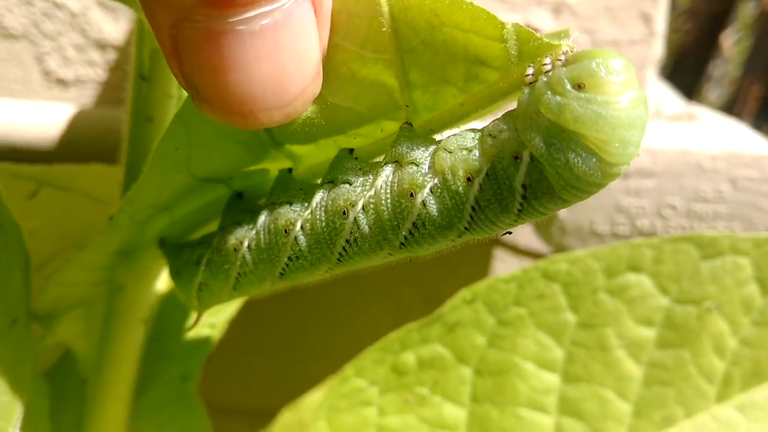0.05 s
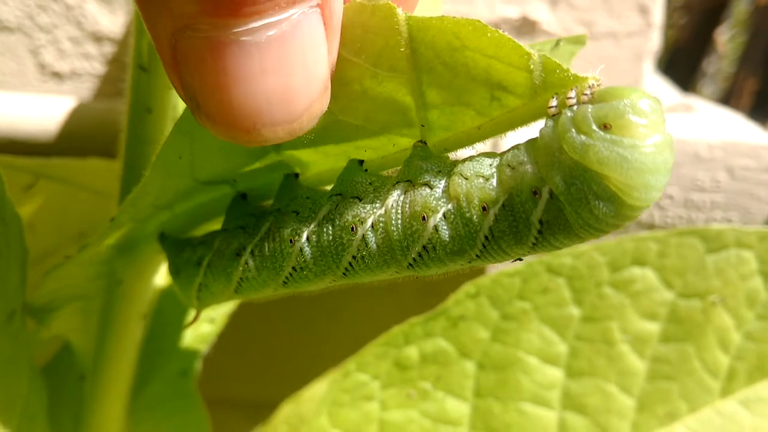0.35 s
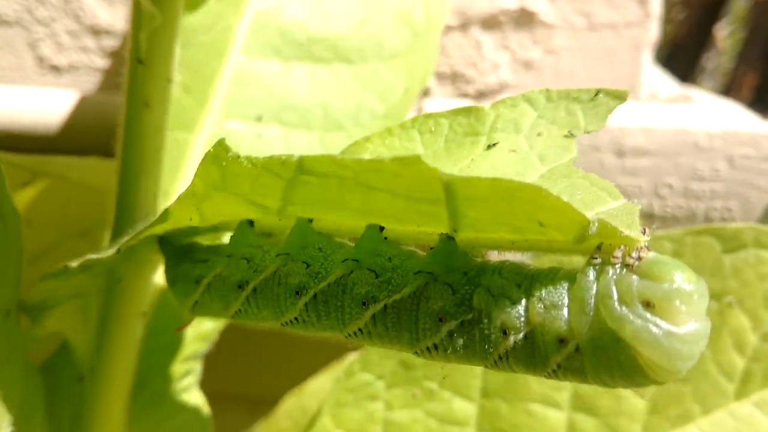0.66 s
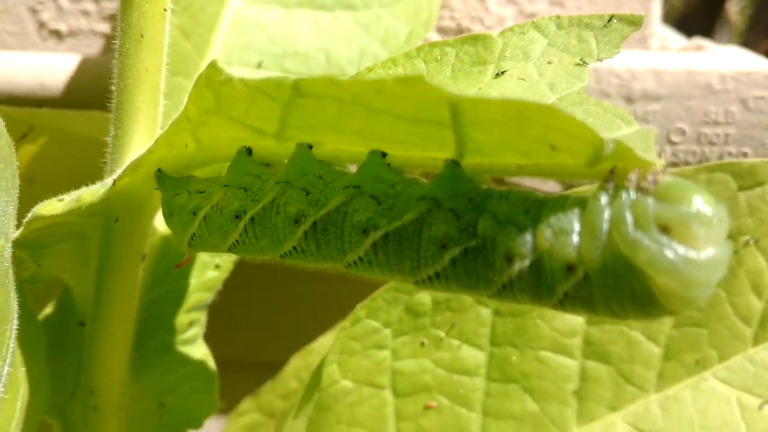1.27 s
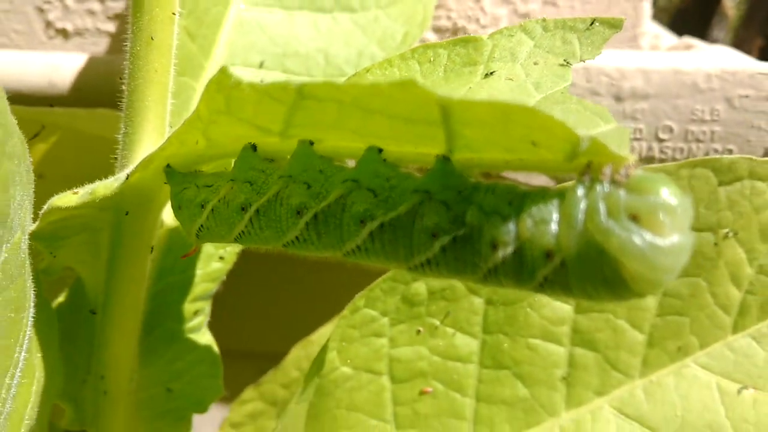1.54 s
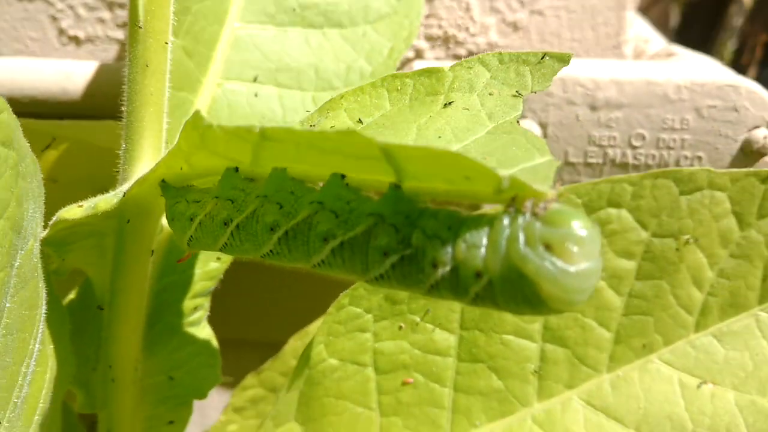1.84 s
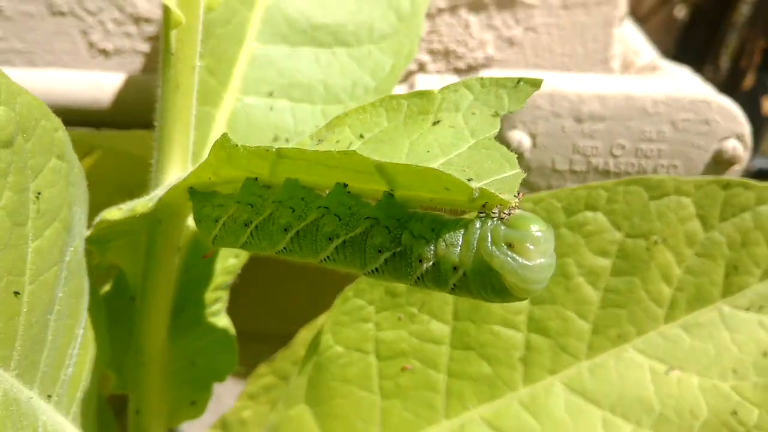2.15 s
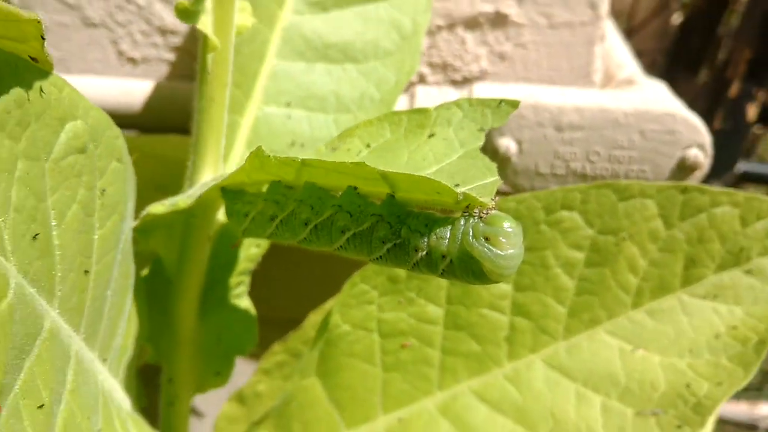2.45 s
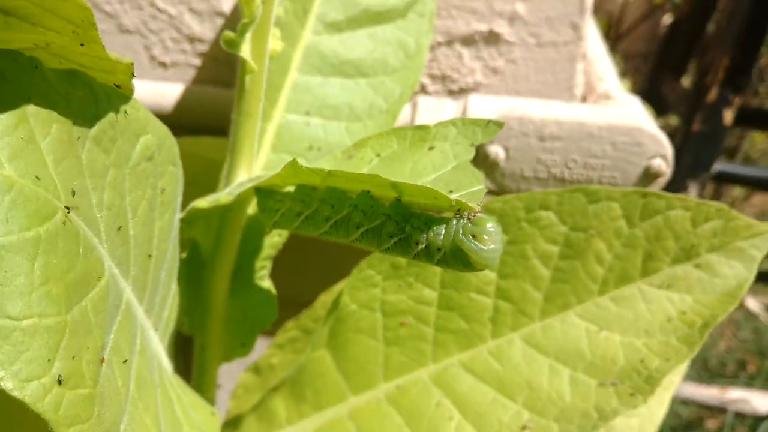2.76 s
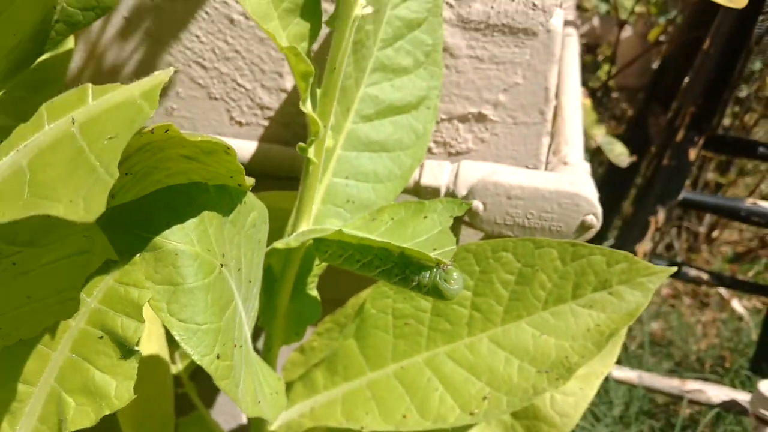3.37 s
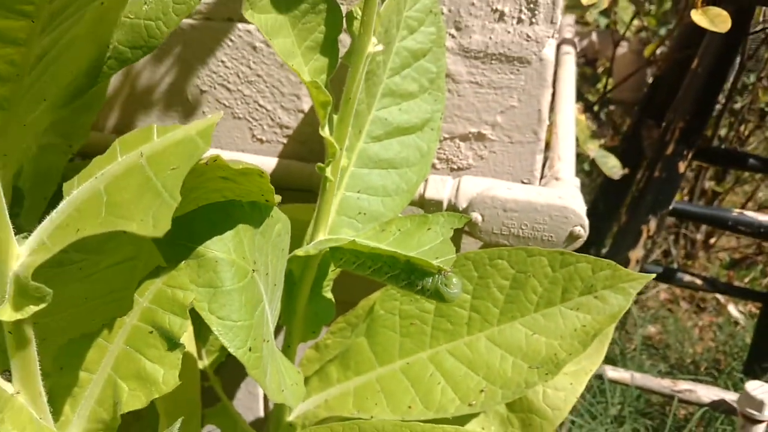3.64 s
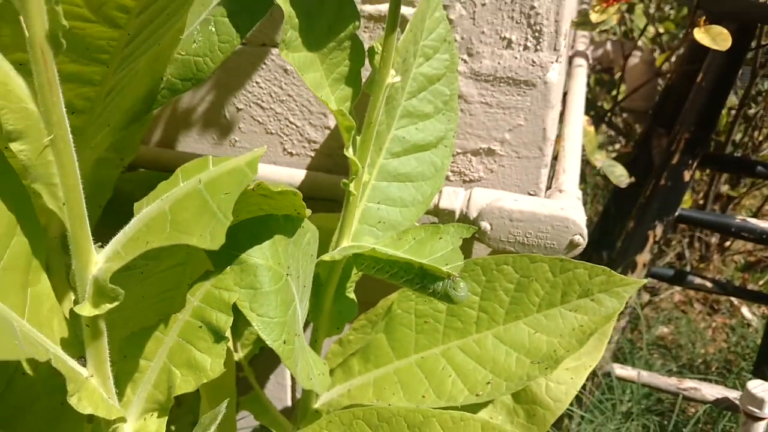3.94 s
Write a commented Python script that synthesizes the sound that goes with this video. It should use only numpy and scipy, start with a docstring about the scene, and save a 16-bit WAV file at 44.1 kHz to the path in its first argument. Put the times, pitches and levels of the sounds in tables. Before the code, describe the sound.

Low outdoor hum, like an air conditioner and far traffic, sits slightly to the right with faint birds. A leaf is released with a soft rustle near the microphone, followed by a few sharp handling clicks and one louder knock.

```python
"""Quiet garden, handheld camera

Far off to the right: a wash like traffic, faint birds, and a humming motor and fan, probably an
air conditioner. A narrow hiss flutters under a thin, electronic-sounding whine. Close to the
microphones a leaf is let go with a faint rustle, and fingers tick and knock on the camera as it draws
back. The recorder widens its pair by cross-feeding them; the loudest knock makes its gain control duck."""
import sys
import numpy as np
from scipy import signal
from scipy.fft import rfft, irfft
from scipy.io import wavfile

SR = 44100
rng = np.random.default_rng(int(sys.argv[2]) if len(sys.argv) > 2 else 0)


def unload_audio(sound):
    """Save the sound as a 16-bit wav file, at the path given as the first command line argument."""
    columns = np.transpose(np.atleast_2d(sound))
    # keep every value between -1 and 1, then stretch to whole-number steps
    steps = np.round(np.clip(columns, -1, 1) * 32767)
    wavfile.write(sys.argv[1], SR, steps.astype(np.int16))


N = 176400
TIME = np.arange(N) / SR
BINS_HZ = np.fft.rfftfreq(N, 1 / SR)

# Distant wash at the right microphone: frequency_hz, density_db
WASH_SPECTRUM = [(20, -69), (45, -71), (62, -64), (85, -55), (125, -60), (155, -59), (200, -59),
                 (260, -67.5), (400, -77), (750, -79.5), (1020, -82), (1350, -85), (1900, -87), (3100, -87),
                 (4000, -92), (6200, -91), (9000, -97), (12000, -104), (14800, -111), (15800, -124)]
# How alike the wash is at the two microphones: frequency_hz, correlation
WASH_CORRELATION = [(100, 1), (220, 0.94), (450, 0.73), (620, 0.58), (850, 0.078), (2000, -0.14),
                    (8000, 0.17)]
# A narrow hiss and a thin, electronic-sounding whine: pitch_hz, width_hz, level_db, flicker_db
HISS_AND_WHINE_BANDS = [(3320, 37, -76, 6.5), (7810, 36, -72, 4.5)]

MOTOR_HZ, MAINS_HZ, FAN_HZ = 59.17, 60, 45.75
DRAW_BACK_S, FAN_TIMES_S = (2.92, 3.23), (0.9, 1.9, 3.2)
# Motor hum before and after the camera draws back: harmonic, before_db, after_db
MOTOR_HARMONICS = [(2, -37, -44.5), (5, -56.5, -81), (6, -58.5, -66), (8, -62.5, -60), (11, -65.5, -69),
                   (12, -65.5, -72), (14, -63, -88), (15, -69, -63.5), (20, -63, -64), (21, -58.5, -63),
                   (22, -80, -57), (23, -77, -70), (24, -60, -65)]
# Mains hum over the same move: harmonic, before_db, after_db
MAINS_HARMONICS = [(2, -41.5, -42), (4, -55.5, -80), (5, -57, -52)]
# Fan drone at the three FAN_TIMES_S: harmonic, first_db, second_db, third_db
FAN_HARMONICS = [(2, -35, -33.5, -33), (3, -45.5, -40.5, -52), (4, -41.5, -48, -53)]

# Far bird notes: centre_s, half_length_s, pitch_hz, level_db
BIRD_NOTES = [(0.82, 0.092, 3250, -59), (1.876, 0.072, 3860, -59.5), (3.876, .1, 3270, -62),
              (3.893, .025, 2930, -51)]
# The leaf sliding close by: centre_s, half_length_s, level_db, low_hz, high_hz
LEAF_SLIDES = [(0.475, 0.053, -57.5, 3000, 7700), (0.656, 0.13, -63, 7900, 12500),
               (0.788, 0.039, -60, 2600, 5450), (3.08, 0.031, -56.5, 2800, 6540),
               (3.893, 0.06, -65.5, 1600, 3870)]
# Dry ticks of leaf and fingers: start_s, level_db, decay_s, low_hz, high_hz, left_minus_right_db
DRY_TICKS = [(0.4262, -35.5, .0013, 3000, 10500, -4), (.4652, -38.5, .0016, 3000, 8000, -4),
             (.5205, -42, .002, 4000, 6500, -4), (.632, -46, .002, 7500, 11000, -6),
             (2.0481, -27.5, .00034, 4500, 12500, 9), (2.0527, -45, .0012, 7000, 14000, 0),
             (2.5602, -37, .0006, 6000, 13000, -6), (2.631, -41, .0008, 4000, 13000, -6),
             (2.667, -36, .0007, 3500, 12000, -6), (2.8425, -29, .0004, 6000, 12000, -6),
             (3.0498, -32.5, .0004, 3000, 11000, -6), (3.4451, -28.5, .0004, 2600, 9500, 0),
             (3.4462, -45, .003, 2800, 5000, 0)]
# Dull finger pushes on the camera case: centre_s, level_db, half_length_s
FINGER_PUSHES = [(2.549, -22, .0012), (2.8435, -12.5, .00048)]
# Knocks on the case: start_s, level_db, low_hz, high_hz, ring_db
CASE_KNOCKS = [(2.0483, -17, 1150, 2700, -14), (2.5440, -17, 800, 2600, -6), (2.5482, 1.3, 760, 4100, 2),
               (2.8427, -16, 1350, 2900, -25)]
# Resonances of the case: pitch_hz, level_db, t60_s
CASE_RESONANCES = [(620, -11.5, 0.017), (1220, -19, 0.0044)]

# What the recorder subtracts from the opposite microphone: frequency_hz, share
CROSS_FEED_SHARES = [(300, 0.91), (2500, 1), (5000, 0.66), (7500, 0.53), (10000, 0.61)]


def from_db(db):
    """Decibels to gain."""
    return 10 ** (np.asarray(db) / 20)


def at_bins(points):
    """A table read at every FFT bin along a log-frequency axis."""
    hz, value = np.transpose(points)
    return np.interp(np.log(BINS_HZ + 1e-9), np.log(hz), value)


def drift(rate_hz):
    """Random wander with a spread of 1, mostly slower than rate_hz."""
    slow = irfft(rfft(rng.standard_normal(N)) / (1 + (BINS_HZ / rate_hz) ** 2), N)
    return (slow - slow.mean()) / slow.std()


def filtered(x, kind, edges_hz, order=2):
    """Causal Butterworth filter."""
    return signal.sosfilt(signal.butter(order, edges_hz, kind, fs=SR, output="sos"), x + 1e-18)


def delayed(x, seconds):
    """Delay by any fraction of a sample."""
    return irfft(rfft(x) * np.exp(-2j * np.pi * BINS_HZ * seconds), N)


def swell(centre_s, half_length_s):
    """Bell-shaped envelope, down to 1/e at half_length_s from its centre."""
    return np.exp(-((TIME - centre_s) / half_length_s) ** 2)


def ring(x, pitch_hz, t60_s):
    """One resonance: a unit click starts a dying sine of height 1."""
    radius = np.exp(-np.log(1000) / (t60_s * SR))
    angle = 2 * np.pi * pitch_hz / SR
    return signal.lfilter([0, np.sin(angle)], [1, -2 * radius * np.cos(angle), radius ** 2], x + 1e-18)


def distant_wash(waver_db=0.25):
    """Steady far noise like traffic, alike at both microphones in the bass only."""
    mid, side = rfft(rng.standard_normal((2, N))) * from_db(at_bins(WASH_SPECTRUM)) * np.sqrt(SR) / 2
    alike = at_bins(WASH_CORRELATION)
    pair = irfft(np.sqrt(1 + alike) * mid + np.sqrt(1 - alike) * side * [[1], [-1]], N)
    return pair * from_db(waver_db * drift(rate_hz=3))


def hiss_and_whine():
    """A fluttering narrow hiss near 3.3 kHz and a thin, electronic-sounding whine near 7.8 kHz."""
    out = np.zeros((2, N))
    for pitch_hz, width_hz, level_db, flicker_db in HISS_AND_WHINE_BANDS:
        peak = 1 / (1 + (2 * (BINS_HZ - pitch_hz) / width_hz) ** 2)
        tone = irfft(rfft(rng.standard_normal((2, N))) * peak, N)
        out += tone / tone.std() * from_db(level_db + flicker_db * drift(rate_hz=15))
    return out


def machine_hum(base_hz, harmonics, times_s, waver_db=0.5, waver_hz=1.9, wander_rad=0.2):
    """Wavering harmonics of a motor, fan or mains; their balance shifts as the camera moves."""
    out = np.zeros(N)
    for harmonic, *levels_db in harmonics:
        level_db = np.interp(TIME, times_s, levels_db) + waver_db * drift(waver_hz)
        phase = 2 * np.pi * (harmonic * base_hz * TIME + rng.random())
        out += np.sqrt(2) * from_db(level_db) * np.sin(phase + wander_rad * drift(waver_hz))
    return out


def far_birds(wobble_hz=38.6):
    """Short wobbling notes, blurred by distance."""
    out = np.zeros(N)
    for centre_s, half_length_s, pitch_hz, level_db in BIRD_NOTES:
        phase = 2 * np.pi * np.cumsum(pitch_hz + wobble_hz * drift(rate_hz=64)) / SR
        out += from_db(level_db) * np.sin(phase) * swell(centre_s, half_length_s)
    return out


def leaf_rustles(grain_db=3):
    """A leaf slides near the microphones in soft, grainy swells."""
    out = np.zeros(N)
    for centre_s, half_length_s, level_db, low_hz, high_hz in LEAF_SLIDES:
        friction = rng.standard_normal(N) * from_db(grain_db * drift(rate_hz=280))
        grains = filtered(friction, "band", [low_hz, high_hz])
        out += from_db(level_db) * grains / grains.std() * swell(centre_s, half_length_s)
    return out


def close_ticks(crack_db=4):
    """Leaf and fingers snap: a crack and a brief crumbling tail, each placed between the microphones."""
    out = np.zeros((2, N))
    for start_s, level_db, decay_s, low_hz, high_hz, left_db in DRY_TICKS:
        envelope = (TIME >= start_s) * np.exp(-np.abs(TIME - start_s) / decay_s)
        crack = from_db(crack_db) * signal.unit_impulse(N, int(start_s * SR))
        tail = rng.choice([-1, 1], N) * envelope / np.linalg.norm(envelope)
        snap = filtered(crack + tail, "band", [low_hz, high_hz])
        out += from_db([[level_db + left_db], [level_db]]) * snap * envelope.std() / snap.std()
    return out


def finger_thumps():
    """The soft pad of a finger gives the case one smooth push, without ring."""
    pushes = sum(from_db(level_db) * swell(centre_s, half_length_s)
                 for centre_s, level_db, half_length_s in FINGER_PUSHES)
    return filtered(pushes, "high", edges_hz=130, order=1)


def case_knocks():
    """Each knock on the camera is one pulse without bass, duller when soft, with a brief ring."""
    out = np.zeros(N)
    for start_s, level_db, low_hz, high_hz, ring_db in CASE_KNOCKS:
        click = signal.unit_impulse(N, int(start_s * SR))
        pulse = filtered(click, "low", high_hz)
        ringing = sum(from_db(mode_db + ring_db) * ring(click, pitch_hz, t60_s)
                      for pitch_hz, mode_db, t60_s in CASE_RESONANCES)
        out += from_db(level_db) * filtered(pulse / pulse.max() + ringing, "high", low_hz, order=5)
    return out


def scene():
    """The left and right microphones: a quiet background bed, with leaf and handling close by."""
    motor = machine_hum(MOTOR_HZ, MOTOR_HARMONICS, DRAW_BACK_S)
    mains = machine_hum(MAINS_HZ, MAINS_HARMONICS, DRAW_BACK_S)
    fan = machine_hum(FAN_HZ, FAN_HARMONICS, FAN_TIMES_S)
    bed_left, bed_right = motor + mains + fan + distant_wash() + hiss_and_whine() + far_birds()
    # The bed sits to the right: on the left it is later and weaker. The left microphone also gives less deep
    # bass.
    bed_left = from_db(-2.5) * delayed(bed_left, seconds=0.0002467)
    bed_left = filtered(bed_left, "high", edges_hz=35, order=1)
    leaf = leaf_rustles()
    handling = finger_thumps() + case_knocks()
    # The case shakes the left microphone less, later and the opposite way.
    handling_left = -from_db(-7.5) * delayed(handling, seconds=0.000394)
    left = bed_left + from_db(-1.5) * leaf + handling_left
    right = bed_right + leaf + handling
    return np.array([left, right]) + close_ticks()


def widen(pair, delay_s=0.0004005):
    """Each microphone has a filtered, delayed copy of the other subtracted."""
    cross_feed = irfft(rfft(pair[::-1]) * at_bins(CROSS_FEED_SHARES), N)
    return pair - delayed(cross_feed, delay_s)


def gain_control(pair, threshold_db=-20.5, duck_share=0.39, attack_s=0.0049, recover_db_per_s=9.5):
    """A peak on either side quickly pushes the gain of both down; it creeps back."""
    peak_db = 20 * np.log10(np.abs(pair).max(axis=0) + 1e-9)
    wanted_db = np.maximum(peak_db - threshold_db, 0) * duck_share
    recovery_db = recover_db_per_s * TIME
    held_db = np.maximum.accumulate(wanted_db + recovery_db) - recovery_db
    pole = np.exp(-1 / (attack_s * SR))
    duck_db = signal.lfilter([1 - pole], [1, -pole], held_db)
    return pair * from_db(-duck_db)


def record(dry, stopband_hz=16400):
    """The recorder widens the pair, ducks on peaks, clips at full scale and cuts the top treble."""
    ducked = gain_control(widen(dry))
    top_cut = signal.cheby2(16, 70, stopband_hz, fs=SR, output="sos")
    return signal.sosfilt(top_cut, np.clip(ducked, -1, 1))


dry = scene()
out = record(dry)
unload_audio(out)
```